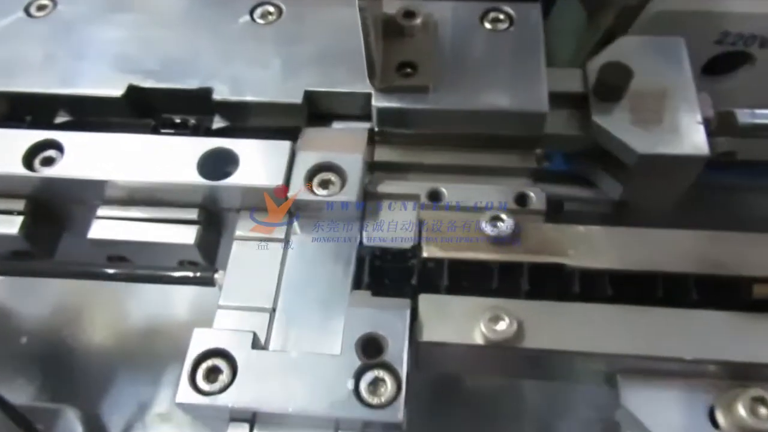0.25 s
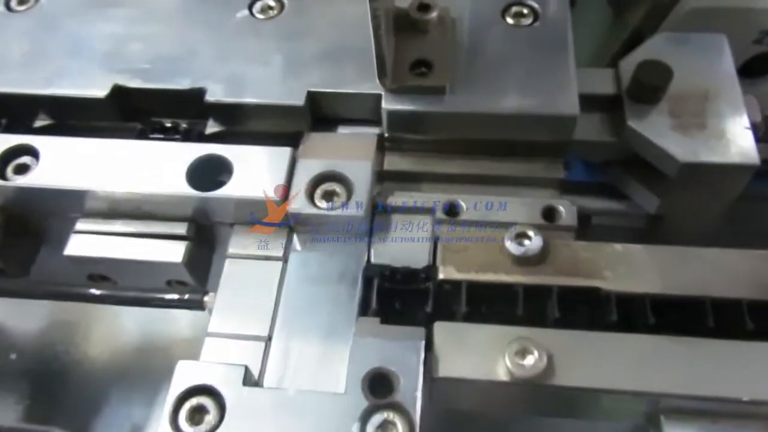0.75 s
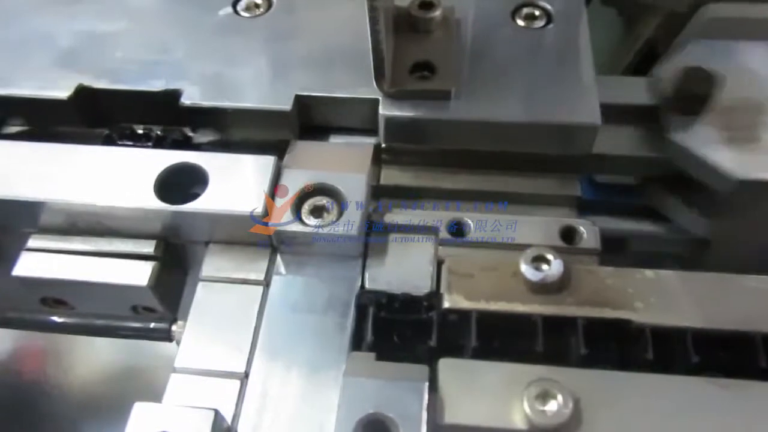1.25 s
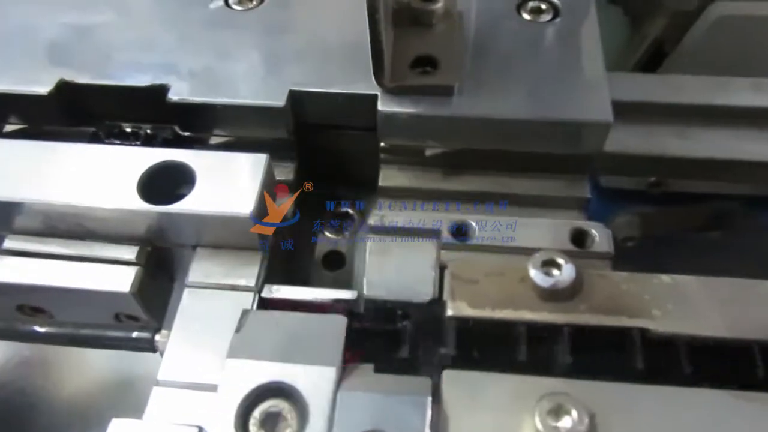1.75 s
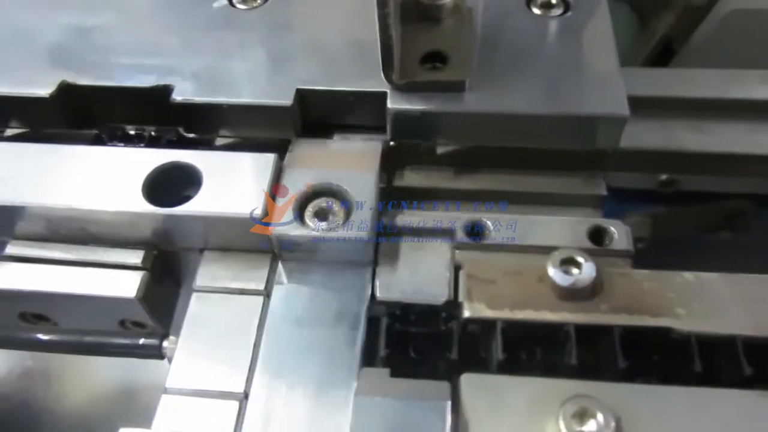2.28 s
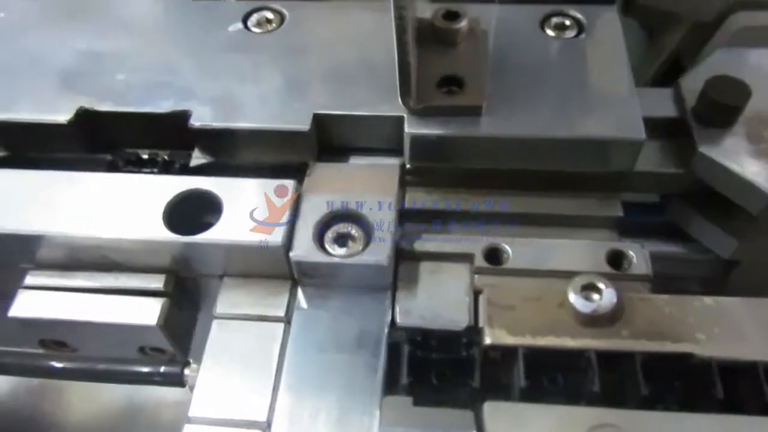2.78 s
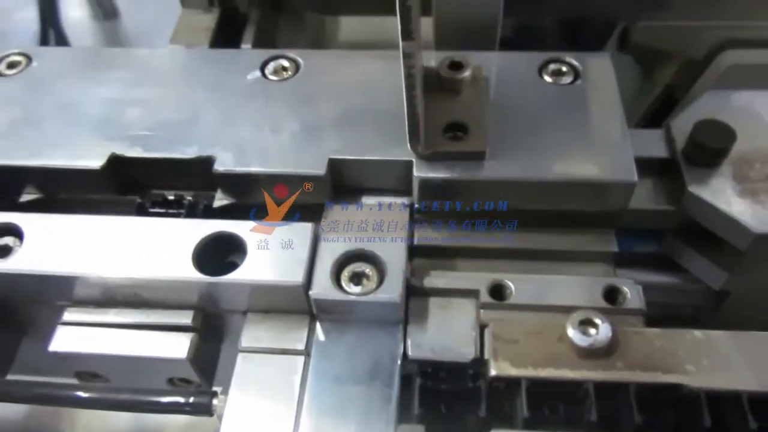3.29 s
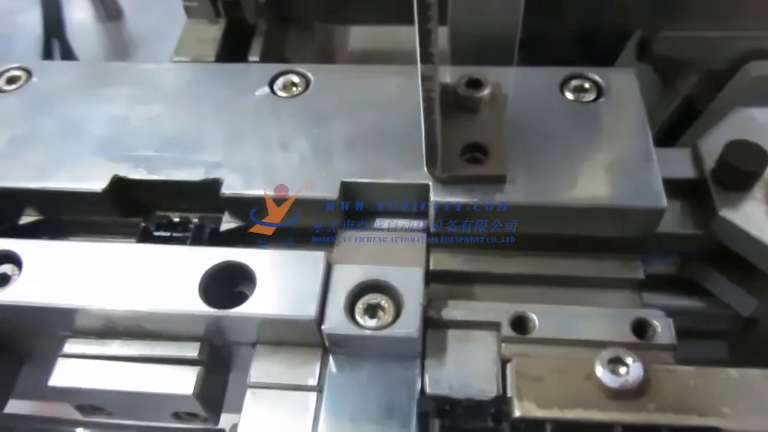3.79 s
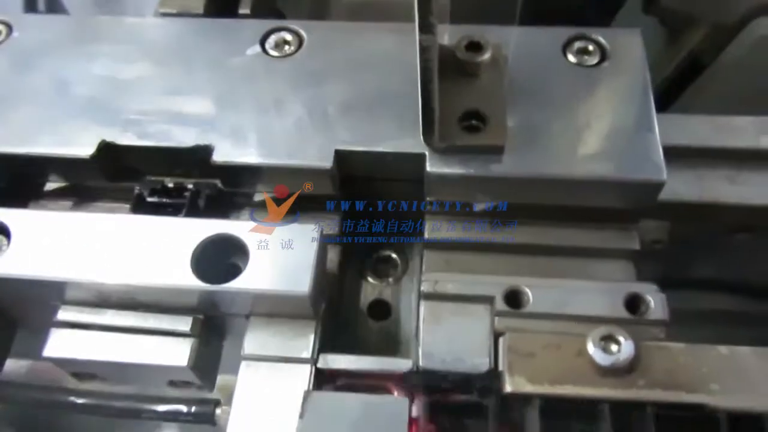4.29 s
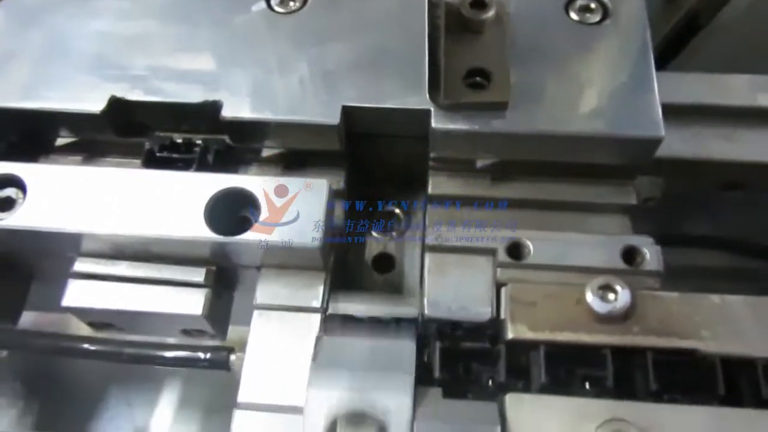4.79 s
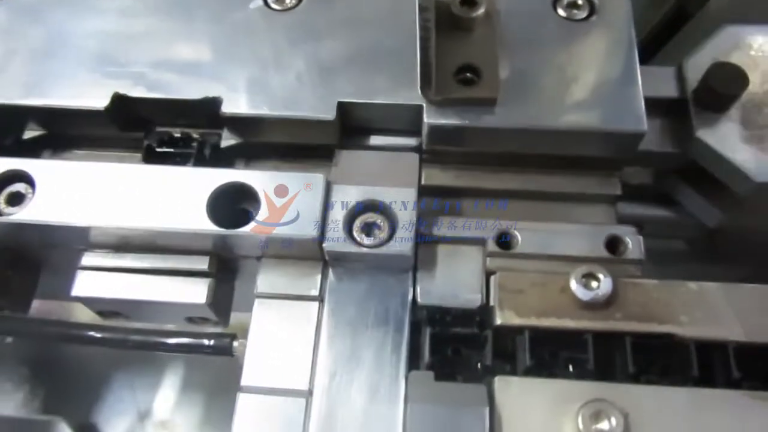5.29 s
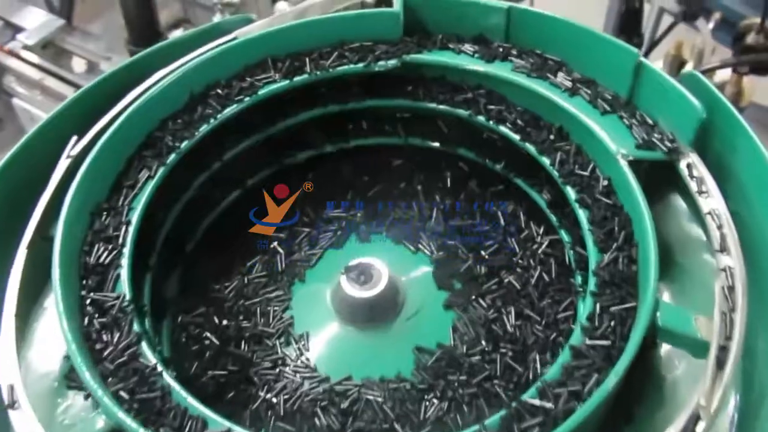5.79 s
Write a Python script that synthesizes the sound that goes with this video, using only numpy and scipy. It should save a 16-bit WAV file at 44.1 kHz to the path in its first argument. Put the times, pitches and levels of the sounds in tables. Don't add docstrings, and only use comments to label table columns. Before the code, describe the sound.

Compressed air hisses constantly over a dense feeder buzz while steel slides clack and slam in cycles, ending with quick knocks beside a rustling feeder bowl.

```python
import sys
import numpy as np
from scipy import signal
from scipy.fft import rfft, irfft, next_fast_len
from scipy.io import wavfile
from scipy.ndimage import uniform_filter1d, map_coordinates

SR = 44100
rng = np.random.default_rng(int(sys.argv[2]) if len(sys.argv) > 2 else 0)


def persist_wave(psi):
    counts = np.round(np.clip(psi, -1, 1) * 32767).astype(np.int16)
    wavfile.write(sys.argv[1], SR, np.atleast_2d(counts).T)


def invert_db(x):
    u = np.asarray(x, float) / 20
    return 10 ** u


N = 266805

SHAKE_HZ = 103.3
CUT_S = 5.63

# (time [s], level [dB])
NEARNESS = [(0, 0.5), (.8, -1.5), (1.45, 1), (1.7, -2), (2.2, 0), (2.8, -1), (3.7, -2), (4.05, 0.5),
            (4.27, -3), (4.6, -2.5), (5.0, -1.5), (5.5, -2), (5.75, 0), (6.05, -0.5)]
# (time [s], strength [dB])
PRESS_STARTS = [
    (1.553, 0),
    (4.15, 0.0098),
]


def unit(x):
    return x / np.sqrt(np.mean(x ** 2) + 1e-20)


def along(points, hz):
    f, v = np.transpose(points)
    return np.interp(np.log(hz + 1), np.log(f + 1), v)


def curves(rows):
    s, *cols = np.transpose(rows)
    return [np.interp(np.arange(N) / SR, s, c) for c in cols]


def wobble(rate):
    knots = rng.standard_normal(int(N * rate / SR) + 4)
    return map_coordinates(knots, [np.arange(N) * rate / SR])


def switched(rows, off_db, rise_s, fall_s):
    t = np.arange(N) / SR
    power = invert_db(2 * off_db)
    for s, length, db in rows:
        rise = np.clip((t - s) / rise_s, 0, 1)
        fall = np.exp(-np.maximum(t - s - length, 0) / fall_s)
        power = power + (invert_db(db) * rise * fall) ** 2
    return 10 * np.log10(power)


def filtered(x, response):
    m = next_fast_len(N + SR // 2)
    return irfft(rfft(x, m) * response(np.fft.rfftfreq(m, 1 / SR)), m)[..., :N]


def colour(spectrum):
    return lambda hz: invert_db(along(spectrum, hz))


def resonances(modes):
    def response(f):
        total = 0
        for k, (c, w, db) in enumerate(modes):
            total = total + (-1) ** k * invert_db(db) * 1j * f * w / (c * c - f * f + 1j * f * w)
        return total
    return response


def ports(pair):
    # (frequency [Hz], correlation [0-1])
    likeness = [(100, .998), (600, .99), (1400, .96), (2500, .9), (4000, .65), (6500, .45), (9000, .5),
                (13000, .7)]
    # (frequency [Hz], phase [rad])
    left_lead = [(3000, 0), (4500, -.4), (6700, -1.7), (9000, -2.35), (12500, -2.25), (15500, -2.9)]

    def share(hz):
        turn = np.arccos(np.clip(along(likeness, hz), -1, 1)) / 2
        return np.array([np.cos(turn), np.sin(turn)])

    def shift(hz):
        return np.exp(.5j * np.outer([1, -1], along(left_lead, hz)))

    mid, side = filtered(pair, share)
    return filtered(np.array([mid + side, mid - side]), shift)


def rush(response, patchy_db, grain=1):
    z = signal.stft(grain * rng.standard_normal((2, N)), nperseg=512)[2]
    patches = uniform_filter1d(rng.standard_normal(z.shape[1:]), size=5, axis=0)
    patches = uniform_filter1d(patches, size=8, axis=1)
    noise = signal.istft(z * invert_db(patchy_db * unit(patches)), nperseg=512)[1][:, :N]
    pair = filtered(noise, response)
    return pair / np.std(ports(pair).mean(0))


def hall():
    # (frequency [Hz], level per Hz [dB])
    rumble_colour = [(13, -57), (22, -31), (43, -48), (98, -11), (146, -9), (200, -3), (296, -2.5),
                     (450, -5.5), (500, -1.5), (650, -40), (1100, -120)]
    # (frequency [Hz], level per Hz [dB])
    clatter_colour = [(240, -27), (400, -12.5), (607, -1), (676, -2), (1180, -2), (2000, -2.5),
                      (2600, -15.5), (4400, -120)]
    # (start [s], length [s], level [dB])
    busy = [
        (-.1, 1.52, -33.5),
        (1.95, 0.59, -36.5),
        (2.95, 1.09, -34.5),
        (5.6, 0.36, -32.5),
    ]
    rise_s, fall_s = 0.085, 0.29
    drive = [(s - .2, 0.41, -47.5) for s, db in PRESS_STARTS]
    clatter_db = switched(busy, -34, rise_s, fall_s) + 0.66 * curves(NEARNESS)[0] + .8 * wobble(12)
    rumble_db = switched(drive, -47, rise_s, fall_s)
    clatter = invert_db(clatter_db) * rush(colour(clatter_colour), patchy_db=2.06)
    return clatter + invert_db(rumble_db) * rush(colour(rumble_colour), patchy_db=2.5)


def hum():
    # (start [s], length [s], level [dB])
    coil_on = [(.1, 0.36, -53), (.8, .5, -54.5), (1.6, 0.34, -59), (2.35, 1, -58.5), (3.5, 0.48, -53.5),
               (4.28, 0.17, -59), (4.7, 0.42, -58), (5.28, 0.14, -52), (5.62, .5, -54)]
    coil_db = switched(coil_on, off_db=-62.5, rise_s=0.027, fall_s=0.034) + 1.46 * wobble(4.0)
    motor_db = -52 + 2.2 * wobble(9)
    t = np.arange(N) / SR
    coils = np.sin(2 * np.pi * 100 * t) + 0.29 * np.sin(2 * np.pi * SHAKE_HZ * t + 1.9)
    motor = np.sin(2 * np.pi * 216 * t + 0.89 * wobble(14))
    motor = motor + .5 * np.sin(4 * np.pi * SHAKE_HZ * t + wobble(2.5))
    tones = invert_db(coil_db) * unit(coils) + invert_db(motor_db) * unit(motor)
    return np.array([tones, 0 * tones])


def air():
    # (frequency [Hz], level per Hz [dB])
    leak_colour = [(1200, -16), (1700, -8.5), (2500, -1), (3700, 5), (5300, 2), (6800, 3.5), (7500, 2.5),
                   (9500, 2), (11500, 5), (14000, -3.5), (15500, 5), (16300, -34)]
    # (frequency [Hz], width [Hz], level [dB])
    exhaust_modes = [(2250, 620, 0), (2620, 520, -1)]
    # (frequency [Hz], width [Hz], level [dB])
    nozzle_modes = [(3050, 800, -12), (3730, 260, -4), (4400, 360, 0), (5280, 330, 1), (6200, 700, -4)]
    # (start [s], length [s], level [dB])
    exhaust_open = [
        (-.1, 1.53, -34.5),
        (1.97, 1.26, -31),
        (3.45, 0.43, -36),
        (4.75, 0.91, -40),
        (5.7, .5, -39),
    ]
    # (start [s], length [s], level [dB])
    nozzle_open = [
        (-.1, 0.63, -34),
        (2.8, .4, -31.5),
        (3.74, 0.16, -30.5),
        (3.93, 0.335, -27),
        (4.3, 1.3, -24),
        (5.035, 0.012, -24),
    ]
    open_s, bleed_s = 0.033, 0.13
    flutter = wobble(13)
    leak_db = -22.5 + curves(NEARNESS)[0] + 0.37 * flutter
    exhaust_db = switched(exhaust_open, -38, open_s, bleed_s) + 0.38 * flutter + 0.38 * wobble(30)
    nozzle_db = switched(nozzle_open, -35, open_s / 4, bleed_s / 2) + .4 * flutter + .5 * wobble(30)
    leak = invert_db(leak_db) * rush(colour(leak_colour), patchy_db=1.5)
    exhaust = invert_db(exhaust_db) * rush(resonances(exhaust_modes), patchy_db=1.5)
    nozzle = invert_db(nozzle_db) * rush(resonances(nozzle_modes), patchy_db=1.2)
    return leak + exhaust + nozzle


def feeder():
    # (time [s], rattle level [dB], track ring level [dB])
    load = [(0, -24, -41), (.5, -26, -35), (1.1, -22.5, -31.5), (1.25, -24.5, -32), (1.5, -26, -33),
            (3.15, -26, -38.5), (4.0, -25, -38), (4.95, -26.5, -34.5), (6.05, -27.5, -54)]
    # (frequency [Hz], width [Hz], level [dB])
    pin_modes = [(12820, 330, 0), (13400, 1500, -9)]
    # (frequency [Hz], width [Hz], level [dB])
    track_modes = [(10550, 250, 0)]
    # (frequency [Hz], level per Hz [dB])
    bowl_colour = [(220, -30), (350, -2), (500, -5), (800, -9), (1500, -5), (5000, -8), (9000, -12),
                   (13000, -4), (15000, -9), (16000, -30)]
    rattle_db, track_db = curves(load) + 0.72 * curves(NEARNESS)[0]
    t = np.arange(N) / SR
    turn = 2 * np.pi * SHAKE_HZ * t + 0.07 * wobble(3.05)
    hops_db = 3.5 * np.cos(turn) + 1.8 * np.cos(2 * turn + 0.74) + 0.75 * np.cos(turn / 2)
    hops = invert_db(hops_db + 0.81 * wobble(110))

    def grain():
        return hops * invert_db(0.49 * wobble(1500))

    pins = invert_db(rattle_db - 1.5) * rush(resonances(pin_modes), patchy_db=0.7, grain=grain())
    track = invert_db(track_db + 1.6) * rush(resonances(track_modes), patchy_db=2.0, grain=grain())
    heap_level = (t > CUT_S) * invert_db(-28.5 + .7 * wobble(25))
    return pins + track + heap_level * rush(colour(bowl_colour), patchy_db=-1.5)


def valves():
    # (time [s], peak level [dB])
    snap_events = [(0.796, -13), (0.9804, -12), (2.3747, -14), (2.4368, -4), (2.6092, -6), (2.7453, -9),
                   (2.794, -10), (3.3737, -7), (3.3997, -6), (3.7086, -7), (4.4408, -6)]
    t = np.arange(SR // 100) / SR
    snaps = np.zeros(N)
    for s, db in snap_events:
        snaps[round(s * SR):][:len(t)] += invert_db(db + 3.0 - 60 * t / 0.0088) * rng.standard_normal(len(t))
    return filtered(snaps, resonances([(3370, 1600, 0.01)]))


def contacts():
    # (time [s], strength [dB])
    index_starts = [
        (.373, -1.5),
        (2.949, -0.5),
        (5.553, -2.5),
    ]
    clamp_starts = [
        (.596, 0.67),
        (3.169, -0.65),
    ]
    eject_starts = [
        (.23, 2.5),
        (2.795, 3.5),
        (5.401, 4.5),
    ]
    # (delay [s], frame knock level [dB], frame pitch [Hz], slide ring level [dB], slide pitch [Hz])
    index_steps = [
        (0, -12.5, 997, -15.5, 1700),
        (.002, -18, 612, -30, 2440),
        (.024, -20.5, 620, -24, 3700),
    ]
    clamp_steps = [
        (0, -11.5, 1045, -10.5, 3600),
        (.006, -13, 611, -21, 2200),
        (.1085, -14, 770, -18, 1700),
        (.2, -21, 850, -14, 3700),
        (.29, -16, 1030, -28, 2500),
        (.5395, -20, 926, -13, 3750),
    ]
    press_steps = [
        (-.098, -14.5, 1024, -27, 2480),
        (0, -11.5, 1634, -5, 2220),
        (.001, -30, 1610, -9.5, 3380),
        (.01, -21, 1570, -12.5, 1760),
        (.0205, -15, 1295, -10, 2400),
        (.0315, -13, 1070, -14, 1700),
        (.045, -26, 1070, -22, 1700),
        (.2905, -16.5, 1484, -13, 1940),
        (.884, -19.5, 880, -14, 3000),
    ]
    eject_steps = [
        (0, -14, 2900, -18, 3600),
    ]
    # (time [s], frame knock level [dB], frame pitch [Hz], slide ring level [dB], slide pitch [Hz])
    strays = [(.134, -7.5, 1457, -23, 3460), (.487, -21, 790, -16, 2570), (.878, -13, 1540, -31, 2100),
              (2.068, -16.5, 1405, -15, 1710), (2.242, -29, 920, -26, 2270), (2.374, -22, 847, -16, 3720),
              (2.407, -13.5, 1170, -18, 3350), (2.609, -21, 1150, -22, 3760), (3.401, -17, 1410, -19, 2270),
              (4.499, -20, 1510, -31, 3600), (5.414, -23.5, 786, -11.5, 2310),
              (5.666, -11.5, 897, -13, 2580), (5.682, -11.5, 934, -16, 2970),
              (5.715, -13.5, 677, -27, 2540), (5.739, -21, 970, -25, 1950),
              (5.883, -12.5, 891, -14.5, 2460), (5.995, -9, 812, -15, 3350)]
    stations = [(index_starts, index_steps), (clamp_starts, clamp_steps),
                (PRESS_STARTS, press_steps), (eject_starts, eject_steps)]
    cycle = []
    for starts, steps in stations:
        for s, db in starts:
            for delay, knock_db, frame_hz, ring_db, slide_hz in steps:
                if s + delay < CUT_S:
                    cycle.append((s + delay, knock_db + db, frame_hz, ring_db + db, slide_hz))
    return cycle + strays


def ring(modes, struck_hz, t):
    wander = .028 * np.cumsum(rng.standard_normal(len(t)))
    decay = invert_db(-60 * t * max(struck_hz, 700) / 95)
    sound = np.sin(2 * np.pi * struck_hz * t + wander) * decay
    for (hz, db, t60), (spread, start) in zip(modes, rng.standard_normal((len(modes), 2))):
        level_db = db - 7 + 2 * spread - 7 * abs(np.log2(hz / struck_hz))
        sound = sound + invert_db(level_db - 60 * t / t60) * np.sin(2 * np.pi * hz * t + start)
    return sound * (1 - np.exp(-t / 0.00026)) / np.abs(sound).max()


def slides():
    # (frequency [Hz], level [dB], t60 [s])
    frame_modes = [(600, 1, .2), (790, -3, .12), (920, -3, .1), (1065, -2, .09), (1460, -6, .05)]
    # (frequency [Hz], level [dB], t60 [s])
    slide_modes = [(1690, -2, .045), (1970, -3, .04), (2280, 0, .045), (2520, -2, .04), (3260, -7, .03),
                   (3680, -5, .04)]
    # (time [s], level [dB])
    tick_events = [(.235, -9), (1.56, -18), (1.573, -6.5), (2.436, -14), (4.055, -23), (4.162, -11),
                   (4.17, -6), (4.441, -24), (5.037, -3.5), (5.401, -17), (1.843, -20), (5.554, -15),
                   (5.666, -23)]
    t = np.arange(SR // 4) / SR
    body, thuds, cracks, ticks = np.zeros((4, N + SR))
    for s, knock_db, frame_hz, ring_db, slide_hz in contacts():
        now = slice(round(s * SR), round(s * SR) + len(t))
        puff = rng.standard_normal((2, len(t))) * (1 - np.exp(-t / 0.00094))
        body[now] += invert_db(knock_db - 5.5) * ring(frame_modes, frame_hz, t)
        body[now] += invert_db(ring_db - 2.0) * ring(slide_modes, slide_hz, t)
        thuds[now] += invert_db(knock_db - 1.5 - 60 * t / .11) * puff[0]
        cracks[now] += invert_db(ring_db + 5.5 - 60 * t / 0.029) * puff[1]
    for s, db in tick_events:
        burst = rng.standard_normal(len(t)) * (1 - np.exp(-t / 0.0005))
        ticks[round(s * SR):][:len(t)] += invert_db(db - 60 * t / 0.065) * burst
    thud = filtered(thuds[:N], lambda f: resonances([(900, 1300, 0)])(f) ** 2)
    crack = filtered(cracks[:N], lambda f: resonances([(2400, 3200, 0)])(f) ** 2)
    tick = filtered(ticks[:N], resonances([(5940, 4900, 0)]))
    return body[:N] + thud + crack + tick


def walls(x):
    # (frequency [Hz], t60 [s])
    hall_t60 = [(300, 1), (2000, 0.27), (8000, 0.43)]
    hz, t, z = signal.stft(rng.standard_normal((2, SR // 2)), SR, nperseg=256)
    tail = signal.istft(z * invert_db(-60 * t / along(hall_t60, hz)[:, None]), SR, nperseg=256)[1]
    late = np.pad(x, (300, 0))[None]
    return signal.fftconvolve(late, tail / np.linalg.norm(tail[0]), axes=1)[:, :N]


def scene():
    background = hall() + hum() + air() + feeder()
    blows = slides() + valves()
    near = np.array([blows, 0.72 * np.roll(blows, 40)])
    return ports(near + invert_db(-7) * walls(blows) + background)


def gain_control(x):
    keep = np.exp(-1 / (.11 * SR))
    power = signal.lfilter([1 - keep], [1, -keep], np.mean(x ** 2, 0), zi=[np.mean(x ** 2)])[0]
    late = np.pad(power, (900, 0), "edge")[:N]
    x = x * np.minimum(1, (late / invert_db(-31)) ** -.6)
    return x / (1 + np.abs(x / .95) ** 8) ** (1 / 8)


def sparse(z, hz):
    # (frequency [Hz], level [dB])
    lost_below = [(1200, -20), (2000, -5), (3000, -3.5), (5500, -4.5), (8500, 0), (10000, -3.5),
                  (12500, -5), (14500, 0)]

    def band(v):
        return np.sqrt(np.abs(uniform_filter1d(np.abs(v) ** 2, size=32, axis=0)) + 1e-20)

    left = z * (np.abs(z) > band(z) * invert_db(along(lost_below, hz))[:, None])
    return left * np.minimum(band(z) / band(left), 2)


def thrifty(x):
    # (start [s], top of the middle [Hz], share of low side bands kept [0-1])
    spells = [(0, 15350, .42), (1.65, 14800, .4), (2.0, 15100, .33), (3.92, 15650, .75), (4.23, 14300, .75),
              (5.6, 15300, 0)]
    hz, t, (mid, side) = signal.stft([x[0] + x[1], x[0] - x[1]], SR, nperseg=2048)
    s, top_hz, share = np.transpose(spells)
    spell = np.searchsorted(s, t, "right") - 1
    mid = mid * (hz[:, None] < top_hz[spell] + 350 * rng.standard_normal(len(t)))
    luck = rng.random((len(hz) // 16 + 1, len(t) // 2 + 1))
    luck = luck.repeat(16, 0).repeat(2, 1)[:len(hz), :len(t)]
    kept = luck < share[spell] * np.interp(hz, [1800, 2200], [1, .55])[:, None]
    side = side * (kept | (hz[:, None] > 3400))
    mid, side = signal.istft([sparse(mid, hz), sparse(side, hz)], SR, nperseg=2048)[1][:, :N] / 2
    return np.array([mid + side, mid - side])


def top_cut(x):
    return signal.sosfilt(signal.butter(12, 15900, fs=SR, output="sos"), x)


def record(dry):
    heard = filtered(dry, colour([(20, -5), (50, -16.0), (75, 0.5)]))
    mix = thrifty(gain_control(heard))
    return top_cut(mix)


dry = scene()
out = record(dry)
persist_wave(out)
```